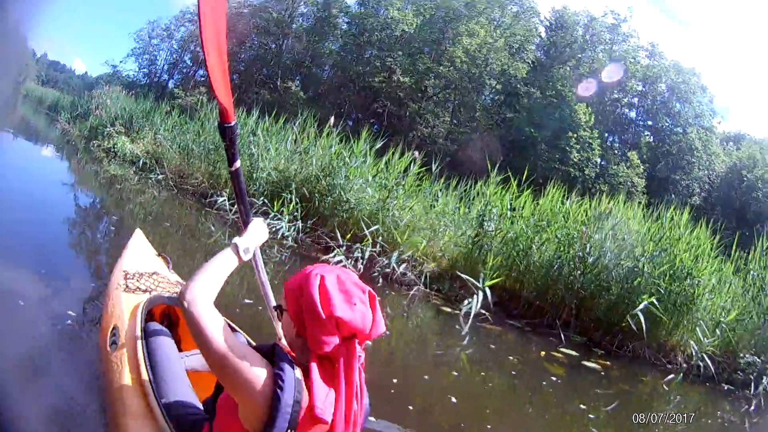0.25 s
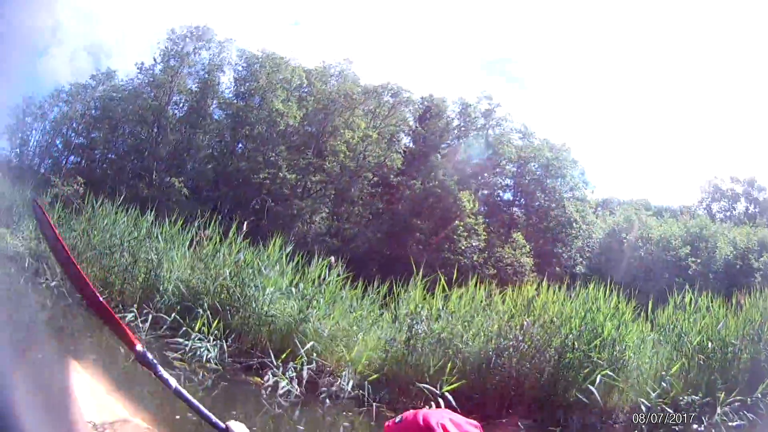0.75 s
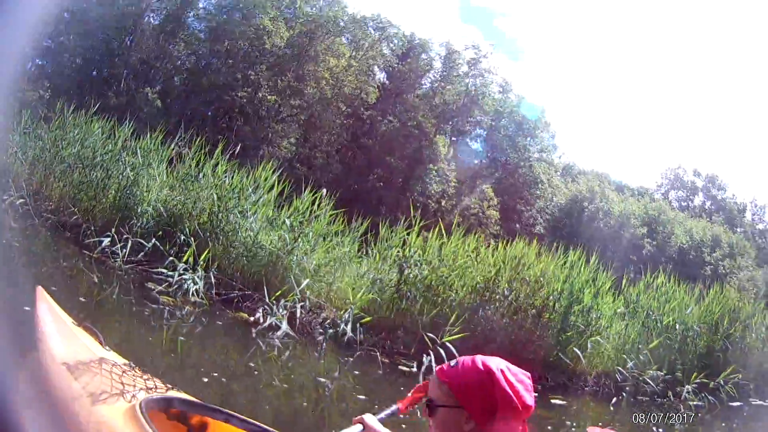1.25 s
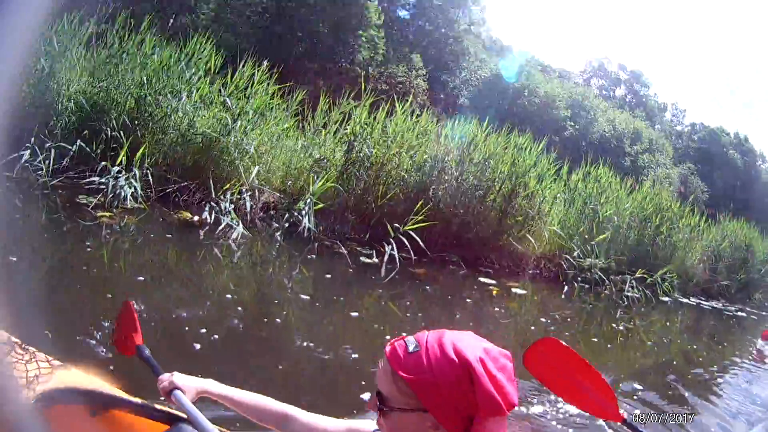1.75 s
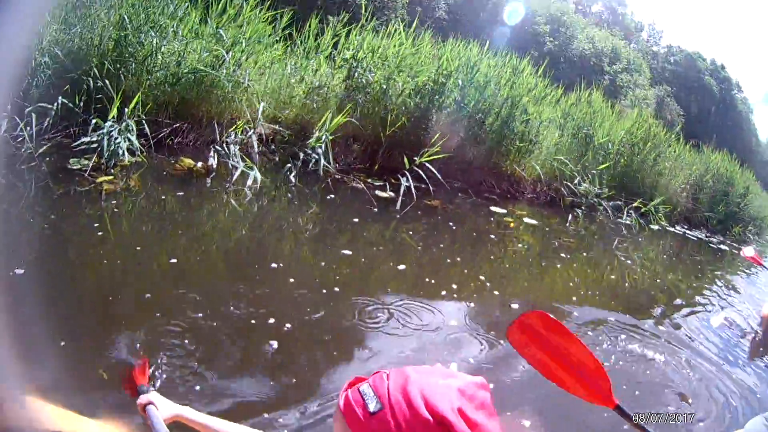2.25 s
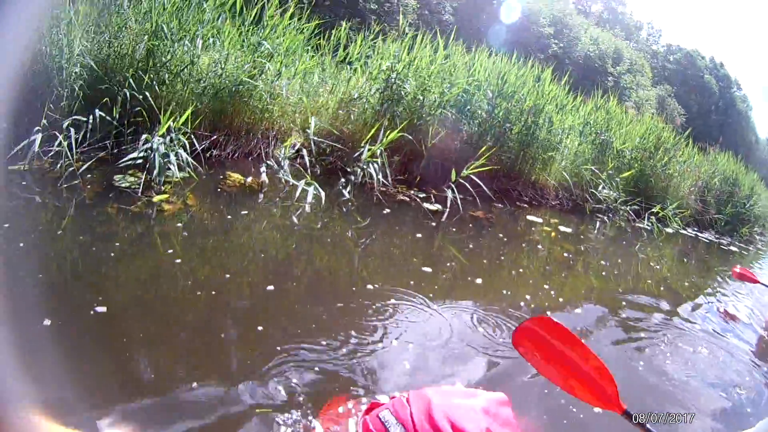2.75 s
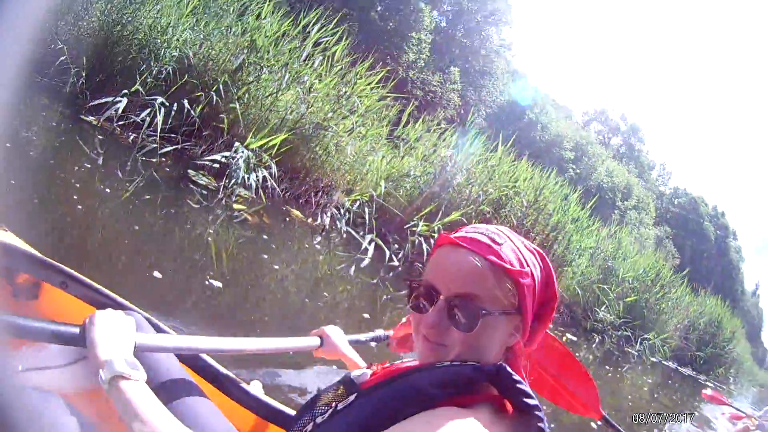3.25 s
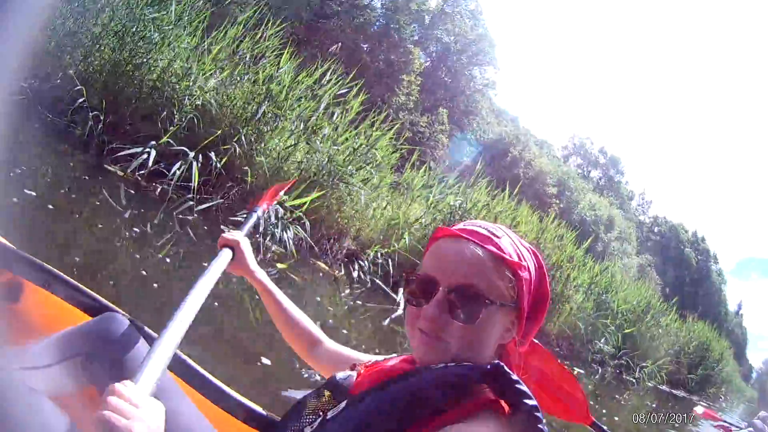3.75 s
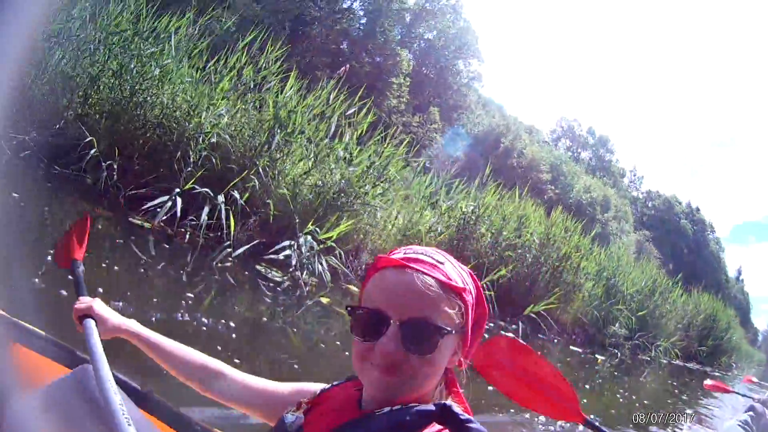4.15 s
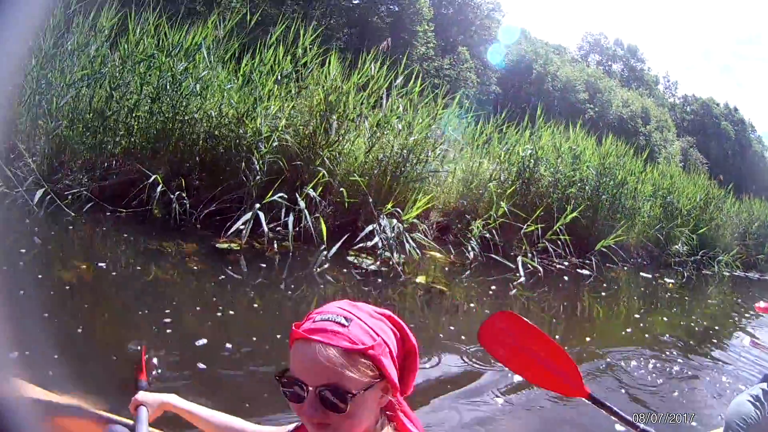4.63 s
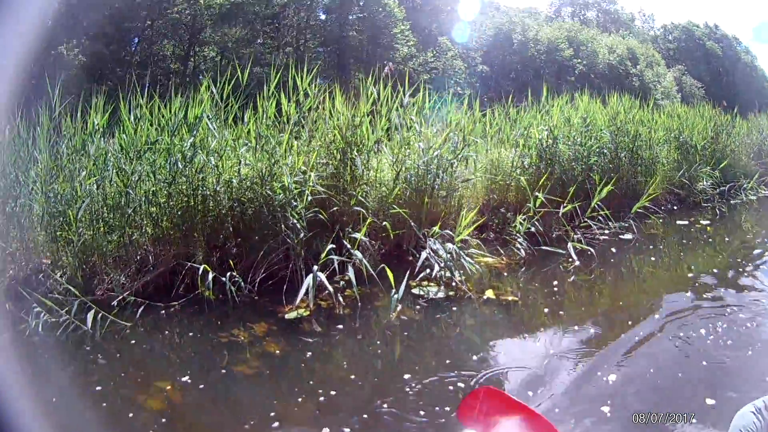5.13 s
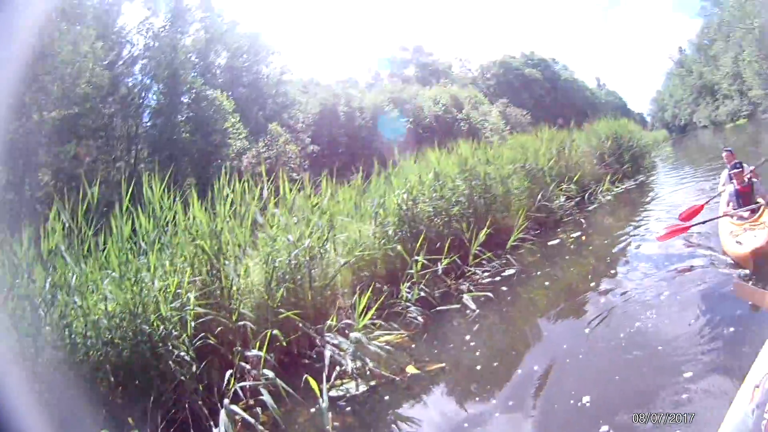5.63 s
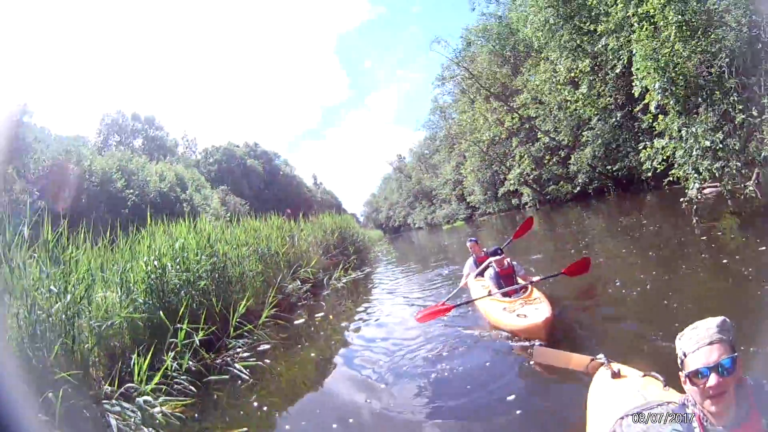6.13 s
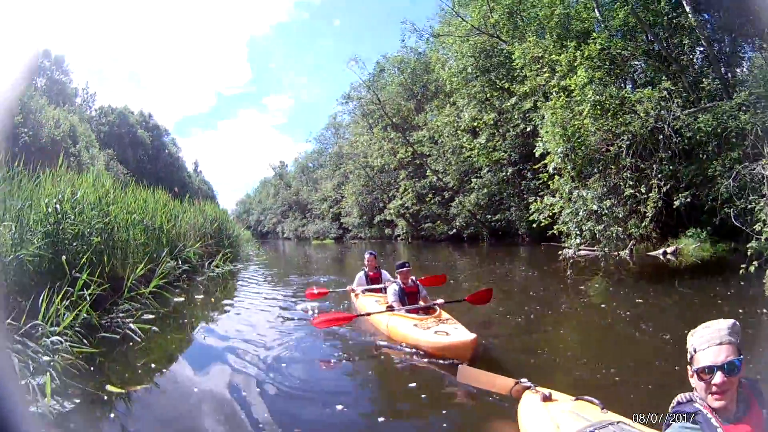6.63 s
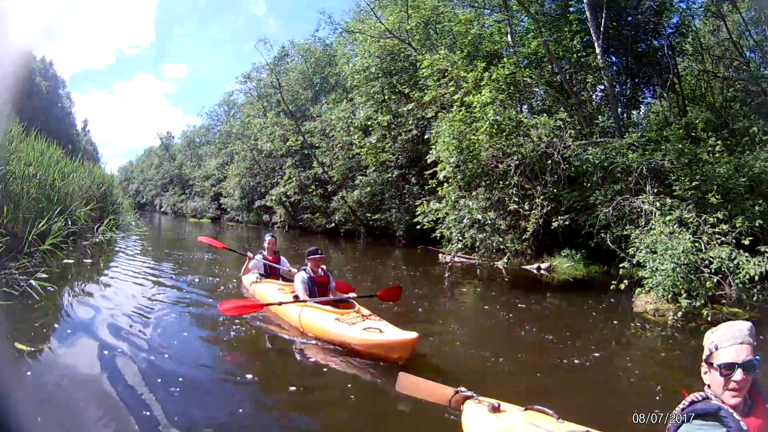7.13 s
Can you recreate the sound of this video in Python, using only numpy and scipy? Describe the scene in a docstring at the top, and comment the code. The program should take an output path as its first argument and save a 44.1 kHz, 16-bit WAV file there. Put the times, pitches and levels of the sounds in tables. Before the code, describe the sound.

A small camera in a sealed plastic case hears a kayak on a quiet river, its contact sounds boxy, dry and very close. Throughout, water laps low and softly under a faint airy rush, slight trickle and hiss. At 0-0.5 s there are clear plastic clacks and gritty scrapes, then two drips and a few soft hull knocks around 1-1.2 s. From 1.6 to 2.35 s violent blows come irregularly, the hardest near 1.6 and 2.3 s, crunching and overloading, with hollow thuds, scrapes between them, and a metal paddle shaft ringing and humming. Quiet water and faint drips follow until another hard cluster at 4.4-4.5 s, again with a short metallic ring. Near 5.5 s comes a lighter tap with rubbing, a tiny scrape at 5.7 s, then scattered rising drips and calm water to about 7.4 s.

```python
"""Hard knocks on a plastic kayak, with short scrapes, dripping and lapping water on a quiet river.
The listener is a small camera in a waterproof case. Each blow makes the case clack, the deck knock,
the hull thud and the mount sway: fading sine waves plus a crunch of noise. The loudest overload the microphone.
Some blows also make a metal paddle shaft ring, and small fittings ping. Scrapes are many tiny random slips;
drips are short tones of rising pitch; the river is shaped noise with a faint trickle of random ticks."""
import sys
import numpy as np
from scipy.fft import rfft, irfft, next_fast_len
from scipy.io import wavfile
from scipy.ndimage import map_coordinates

SR = 44100
rng = np.random.default_rng(int(sys.argv[2]) if len(sys.argv) > 2 else 0)


def log_audio(samples):
    """Write samples as a 16-bit WAV file to the path given in sys.argv[1]."""
    # one column per channel
    frames = np.atleast_2d(samples).T
    # limit to full scale, then quantise
    limited = np.clip(frames, -1, 1)
    pcm = np.round(limited * 32767).astype(np.int16)
    wavfile.write(sys.argv[1], SR, pcm)


N = 325458

# The blows: t/s, case clack level/dB, clack pitch f/Hz, deck knock level/dB, hull thud level/dB, mount sway level/dB
BLOWS = [(0.0634, -6, 1600, -30, -30.5, -41), (.078, -5.5, 1380, -33, -22, -31),
         (.129, -9, 1543, -47, -60, -62), (0.426, -26, 1380, -40.5, -46, -68),
         (0.5107, -22.5, 1630, -49, -58, -60), (0.9886, -26.5, 1340, -38.5, -33.5, -62),
         (1.0005, -28.5, 1420, -40, -29.5, -49), (1.079, -23, 1350, -38.5, -31, -42.5),
         (1.163, -45, 1400, -56, -37.5, -61), (1.6147, 21, 1527, 1, 8, -26.5),
         (1.6237, 11, 1550, -7.5, -2, -41), (1.652, 23, 1447, -1, 2.5, -23),
         (1.8162, 0.5, 1514, -16.5, -19, -39.5), (1.932, 8, 1334, -11.5, -5.5, -32),
         (1.9348, 7.5, 1580, -9, -21.5, -38.5), (2.1341, 20, 1470, -3, -13, -25.5),
         (2.2129, 1.5, 1520, -21, -22, -26), (2.318, 27.5, 1637, 12, 3, -10),
         (2.342, 0, 1410, -21, -23, -31.5), (4.3331, -41, 1550, -46.5, -46, -66),
         (4.436, 20.5, 1404, 3.5, -8, -23), (4.459, -9.5, 1450, -22, -24, -30.5),
         (4.4897, 8, 1496, -26, -13, -25), (4.5, 2, 1580, -23, -20, -39),
         (5.4775, -12.5, 1373, -43, -34.5, -39)]
# Tone colour of rubbed plastic, also used for the trickle: f/Hz, relative level per Hz/dB
RUB_COLOUR = [(90, -21), (250, -10), (400, -12.5), (850, -5.5), (1050, -7.5), (1350, 1), (1650, -1),
              (2000, -11), (2300, -13.5), (2700, -26.5), (4300, -32), (5200, -42.5), (9000, -60.5),
              (16000, -74)]


def amp(db):
    """Turn decibels into a plain gain."""
    return 10 ** (np.asarray(db) / 20)


def unit(x):
    """Scale a sound to an rms (average strength) of 1."""
    return x / np.sqrt(np.mean(x ** 2) + 1e-20)


def curve(rows):
    """Join (t/s, value) rows with straight lines, giving one value per sample."""
    return np.interp(np.arange(N) / SR, *np.transpose(rows))


def wobble(rate):
    """A smooth random curve through `rate` random points a second."""
    points = rng.standard_normal(int(N * rate / SR) + 4)
    return map_coordinates(points, [np.arange(N) * rate / SR])


def decay(t, t60):
    """A gain that falls by 60 dB in t60 seconds."""
    return np.exp(-np.log(1000) * t / t60)


def low_pass(hz, cut_hz, power):
    """Gain that falls above cut_hz; a higher power falls more steeply."""
    return 1 / np.sqrt(1 + (hz / cut_hz) ** power)


def filtered(x, response):
    """Change the strength of each frequency in x by response(frequency)."""
    size = next_fast_len(len(x) + 8192)
    spectrum = rfft(x, size) * response(np.fft.rfftfreq(size, 1 / SR))
    return irfft(spectrum, size)[:len(x)]


def coloured(x, points):
    """Shape x by (f/Hz, level/dB) points, then scale it to rms 1."""
    f, db = np.transpose(points)
    return unit(filtered(x, lambda hz: amp(np.interp(np.log(hz + 1), np.log(f), db))))


def add(track, s, sound):
    """Mix a sound into the track from time s in seconds."""
    part = track[max(round(s * SR), 0):][:len(sound)]
    part += sound[:len(part)]


def stroke(t, press, length, swell_db):
    """Gain of one sliding stroke: it grabs, swells to its hardest press, eases and lets go."""
    edge_s = 0.0036  # how fast it grabs and lets go
    edges = (1 - np.exp(-t / edge_s)) * np.exp(-np.maximum(t - length, 0) / edge_s)
    swell = np.interp(t, [0, press, length], [-swell_db, 0, -swell_db])
    return edges * amp(swell)


def scrape(smooth_share=0.5, uneven_db=1.26):
    """Tiny irregular slips under a sliding contact keep the case buzzing; grit adds a dry treble."""
    # Strokes: start t/s, hardest press t/s, end t/s, peak level/dB, swell/dB, case pitch f/Hz,
    # grit level relative to the rub/dB
    slides = [(0, 0.032, 0.13, -45, 3.5, 1380, -28), (.09, 0.129, 0.14, -36, 10.5, 1560, -15.5),
              (.16, 0.196, 0.334, -61.5, 4, 1286, -35), (0.267, .355, 0.49, -50, 9, 1270, -26),
              (.995, 0.99, 1.12, -53, 30, 1305, -29), (1.83, 1.908, 1.93, -42.5, 9, 1550, -28.5),
              (1.925, 1.98, 2.1, -45, 5, 1510, -22), (2.05, 2.18, 2.237, -32, 14, 1499, -30),
              (2.2, 2.295, 2.31, -38.5, 5, 1755, -29), (4.455, 4.473, 4.496, -36, 6, 1449, -38),
              (5.455, 5.506, 5.56, -42, 10, 1430, -32), (5.655, 5.702, 5.72, -53.5, 8, 1500, -23)]
    # Tone colour of the grit: f/Hz, relative level per Hz/dB
    grit_colour = [(1000, -29), (2300, -3), (4300, 2.5), (5200, -9.5), (7000, -24.5), (12000, -47.5)]
    slips_per_s = 2000
    buzz_db, buzz_width_hz = 4.5, 130  # the case resonance: height, distance to half that height
    out, t = np.zeros(N), np.arange(SR // 2) / SR
    for start, press, end, db, swell_db, hz, grit_db in slides:
        slips = (rng.random(len(t)) < slips_per_s / SR) * rng.standard_normal(len(t))
        friction = unit(slips) + smooth_share * rng.standard_normal(len(t))
        rub = coloured(friction, RUB_COLOUR)
        buzz = unit(filtered(rub, lambda f: amp(buzz_db / (1 + ((f - hz) / buzz_width_hz) ** 2))))
        grit = amp(grit_db) * coloured(slips, grit_colour)
        gain = amp(db) * stroke(t, press - start, end - start, swell_db)
        add(out, start, gain * (buzz + grit))
    return amp(uneven_db * wobble(60)) * out


def rocking():
    """Gain of the extra lapping: each blow rocks the boat, and the water settles again."""
    rock_db, rock_t60 = -30, .7  # level relative to the mount's sway; decay in s
    power, t = np.zeros(N), np.arange(SR) / SR
    for s, *_, sway_db in BLOWS:
        gain = amp(sway_db + rock_db) * decay(t, rock_t60)
        add(power, s, gain ** 2)
    return np.sqrt(power)


def river(split_hz=300, trickle_db=-78, air_db=-65):
    """Water laps low against the hull under a soft open-air rush and a faint trickle."""
    # Tone colour of the water: f/Hz, relative level per Hz/dB
    water_colour = [(12, -31.5), (20, -1.5), (38, 1.5), (65, -5), (203, -11), (386, -14.5), (419, -15.5),
                    (456, -16.5), (775, -20), (1280, -26.5), (1690, -27), (2000, -30), (2720, -34.5),
                    (8090, -48), (15800, -43)]
    # Lapping against the hull, slowly settling, before its random wobble: t/s, level/dB
    flow = [(0, -49.5), (.75, -56.5), (2.8, -57), (7.38, -59.5)]
    ticks_per_s = 60

    def low(hz):
        return low_pass(hz, split_hz, 8)

    def high(hz):
        return np.sqrt(1 - low(hz) ** 2)

    lap = unit(filtered(coloured(rng.standard_normal(N), water_colour), low))
    rush = unit(filtered(coloured(rng.standard_normal(N), water_colour), high))
    ticks = (rng.random(N) < ticks_per_s / SR) * rng.standard_normal(N)
    trickle = coloured(ticks, RUB_COLOUR)

    lap_gain = np.hypot(amp(curve(flow)), rocking()) * amp(1.1 * wobble(8.2))
    rush_gain = amp(air_db + 0.17 * wobble(3))
    trickle_gain = amp(trickle_db + 3.6 * wobble(4))
    return lap_gain * lap + rush_gain * rush + trickle_gain * trickle


def ring(modes, attack, stretch=1, life=1, scatter_db=1):
    """A struck body rings as fading sine waves of alternating sign, at slightly new strengths each time."""
    t = np.arange(int(SR * max(t60 for _, _, t60 in modes))) / SR
    out = np.zeros(len(t))
    for k, (hz, db, t60) in enumerate(modes):
        strength = (-1) ** k * amp(db + scatter_db * rng.standard_normal())
        out += strength * decay(t, t60 * life) * np.sin(2 * np.pi * hz * stretch * t)
    return out * (1 - np.exp(-t / attack))  # attack is in seconds


def crunch(t60, tail_db, tail_t60):
    """The noisy part of a contact: a crack, then a weak, duller wash of dense plastic modes."""
    # Tone colour of the crack: f/Hz, relative level per Hz/dB
    crack_colour = [(100, -3), (500, -4.5), (1000, -1), (1500, 2), (2200, -12), (3000, -19), (4400, -28),
                    (6200, -41), (8000, -60), (16000, -72)]
    # Tone colour of the wash: f/Hz, relative level per Hz/dB
    wash_colour = [(150, -4), (400, -2), (800, -5), (1450, 2), (1900, -6), (2600, -19), (4400, -24),
                   (6000, -40), (16000, -80)]
    t = np.arange(SR // 4) / SR
    crack = coloured(rng.standard_normal(len(t)), crack_colour) * decay(t, t60)
    wash = coloured(rng.standard_normal(len(t)), wash_colour) * decay(t, tail_t60)
    return (crack + amp(tail_db) * wash) * (1 - np.exp(-t / 0.00046))


def knocks():
    """Each blow sets the case, deck, hull and mount ringing together, with a crunch at the contact."""
    # What rings: f/Hz, relative level/dB, time to fade by 60 dB t/s.
    # Each blow shifts the case's pitches and scales its fade times.
    case_modes = [(1493, 4, 0.009), (1269, -11.5, 0.017), (1624, -33, 0.039), (2254, -25, 0.015),
                  (2790, -37.5, .009), (3740, -43.5, 0.007)]
    deck_modes = [(350, -13, 0.019), (475.7, -3, 0.024), (590, -3.5, 0.033), (720, -6, .022),
                  (869, 0, 0.016), (1145, -1.5, .016)]
    hull_modes = [(170, -7, .04), (242.5, -3, 0.054), (285, -11, 0.05)]
    mount_modes = [(33, -3.5, .33), (60, -1, .08), (88, -6, 0.24), (120, -7, .05)]
    crunch_db, crunch_grows = -17, 0.93  # contact noise at a 0 dB clack; dB per dB of clack
    clack_life, life_per_db = 0.94, 0.012  # fade-time factor at 0 dB; harder blows stay in contact longer
    out = np.zeros(N)
    for s, clack_db, clack_hz, deck_db, thud_db, sway_db in BLOWS:
        life = clack_life * np.exp(life_per_db * clack_db)
        stretch = clack_hz / case_modes[0][0]
        noise_gain = amp(crunch_db + crunch_grows * clack_db)
        add(out, s, amp(clack_db) * ring(case_modes, attack=0.0028, stretch=stretch, life=life))
        add(out, s, noise_gain * crunch(t60=0.017, tail_db=-30, tail_t60=0.11))
        add(out, s, amp(deck_db) * ring(deck_modes, attack=.001))
        add(out, s, amp(thud_db) * ring(hull_modes, attack=0.0022))
        add(out, s, amp(sway_db) * ring(mount_modes, attack=0.0011))
    return out


def drips(t60=0.019, rise=5):
    """Each drop from the paddles traps a small bubble whose pitch climbs as it dies, with a short splash."""
    # Drops: t/s, level before the fade/dB, starting pitch f/Hz
    drops = [(0.836, -45.5, 1670), (0.9393, -50, 1410), (2.79, -54.5, 1683), (3.1363, -45.5, 1410),
             (5.5975, -42, 1460), (5.7263, -50, 1598), (5.8644, -52, 1530), (5.9229, -43, 1390),
             (6.319, -47.5, 1480), (6.4696, -53, 1420), (6.8493, -46, 1780)]
    # Tone colour of the splash: f/Hz, relative level per Hz/dB
    splash_colour = [(400, -22), (1000, 1), (1550, -4.5), (2200, -2), (3200, -16), (4500, -22),
                     (8000, -49.5)]
    out, t = np.zeros(N), np.arange(SR // 20) / SR
    for s, db, hz in drops:
        fade = decay(t, t60) * (1 - np.exp(-t / 0.0011))
        bubble = np.sin(2 * np.pi * hz * t * (1 + rise * t))
        splash = coloured(rng.standard_normal(len(t)), splash_colour)
        add(out, s, amp(db) * fade * (bubble + .5 * splash))
    return out


def shaft():
    """Some blows make the metal paddle shaft ring on and hum, and set small metal fittings pinging."""
    # Modes of the shaft's ring: f/Hz, relative level/dB, time to fade by 60 dB t/s
    ring_modes = [(425, -23, 2.3), (1297, 0, .22)]
    # Mode of its hum: f/Hz, relative level/dB, time to fade by 60 dB t/s
    hum_modes = [(627, 0, .41)]
    # Blows that catch the shaft: t/s, ring level/dB, hum level/dB
    shaft_blows = [(1.651, -52, -24.5), (1.932, -62, -44), (2.134, -47.5, -46.5), (2.318, -22.5, -34.5),
                   (4.436, -28, -39.5)]
    # Pings of the fittings: t/s, level before a small random change/dB, pitch f/Hz
    pings = [(1.6149, -42, 4363), (1.651, -42, 3233), (1.931, -40, 3270), (2.134, -42, 4450),
             (2.2128, -54, 4341), (4.4889, -48, 4370)]
    ping_t60 = .11  # s
    out = np.zeros(N)
    for s, ring_db, hum_db in shaft_blows:
        add(out, s, amp(ring_db) * ring(ring_modes, attack=.001))
        add(out, s, amp(hum_db) * ring(hum_modes, attack=.001))
    for s, db, hz in pings:
        add(out, s, ring([(hz, db, ping_t60)], attack=.0005))
    return out


def scene():
    """Contact sounds reach the one microphone through the sealed case, over the sound of the water."""
    case_cut_hz = 5000  # the sealed case passes little above this
    contact = filtered(scrape() + knocks() + shaft(), lambda hz: low_pass(hz, case_cut_hz, 10))
    return (contact + river() + drips())[None]


def record(dry, top=0.91, treble_hz=13500, hiss_db=-81.0, band_limit_hz=15950):
    """The microphone overloads near `top`; the camera dulls the treble, hisses and cuts off at its band limit."""
    clipped = dry[0] / (1 + np.abs(dry[0] / top) ** 20) ** (1 / 20)
    dulled = filtered(clipped, lambda hz: low_pass(hz, treble_hz, 12))
    hiss = amp(hiss_db) * rng.standard_normal(N)
    return filtered(dulled + hiss, lambda hz: low_pass(hz, band_limit_hz, 80))[None]


dry = scene()
out = record(dry)
log_audio(out)
```